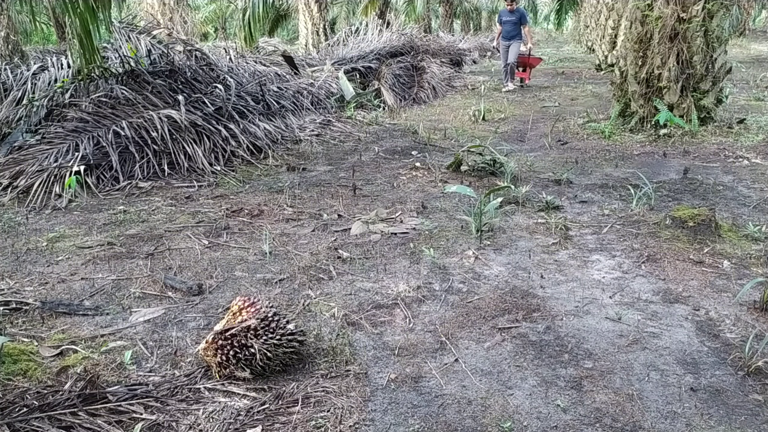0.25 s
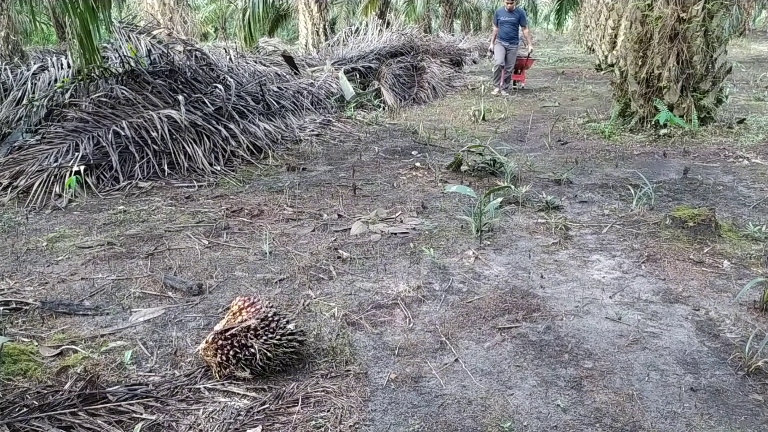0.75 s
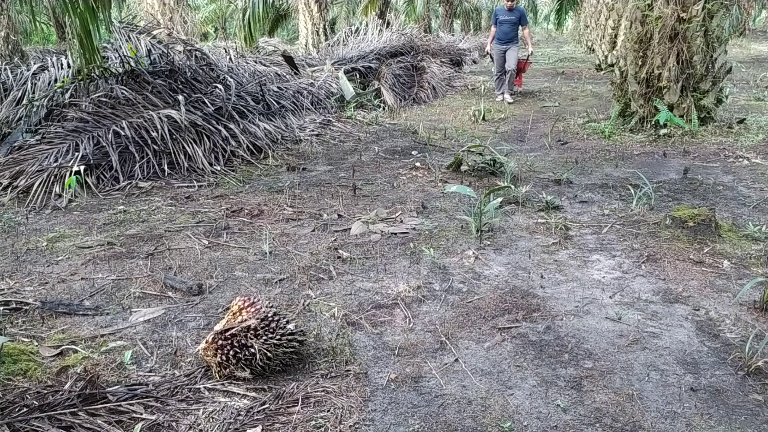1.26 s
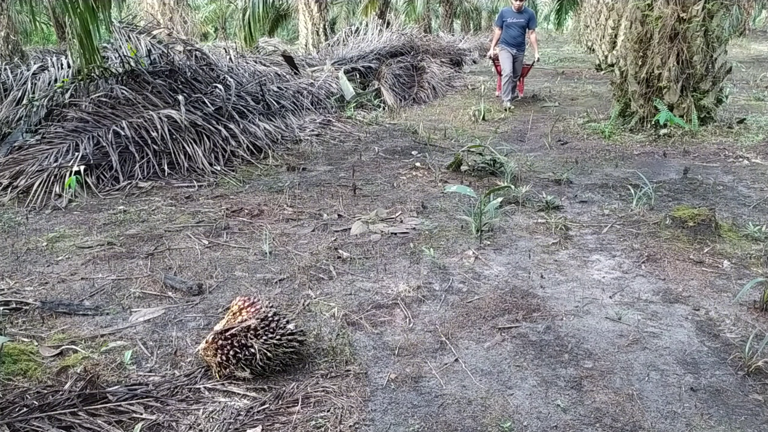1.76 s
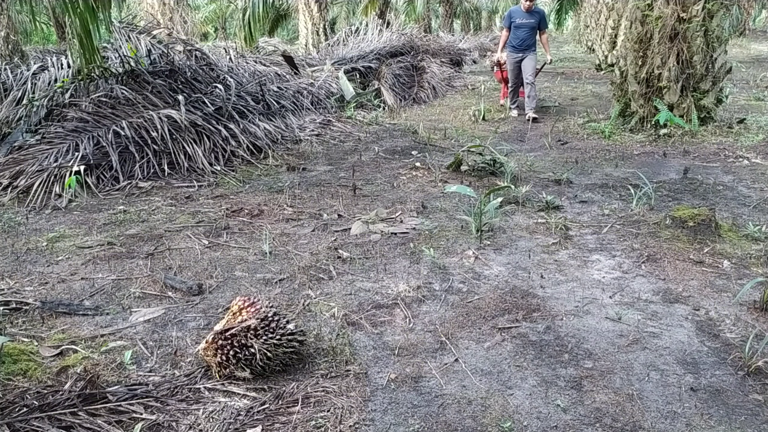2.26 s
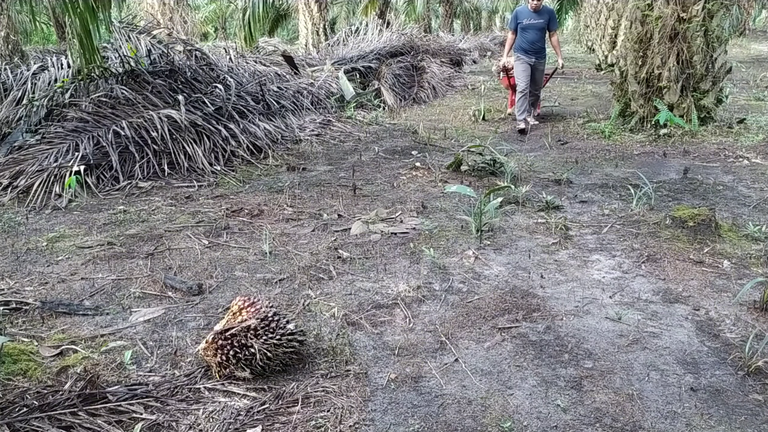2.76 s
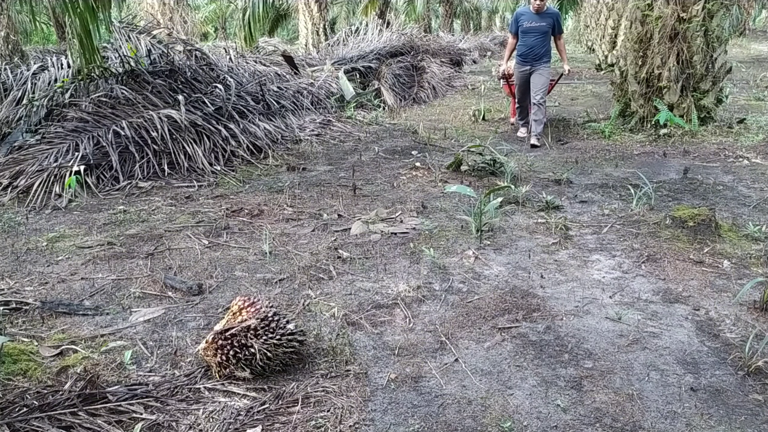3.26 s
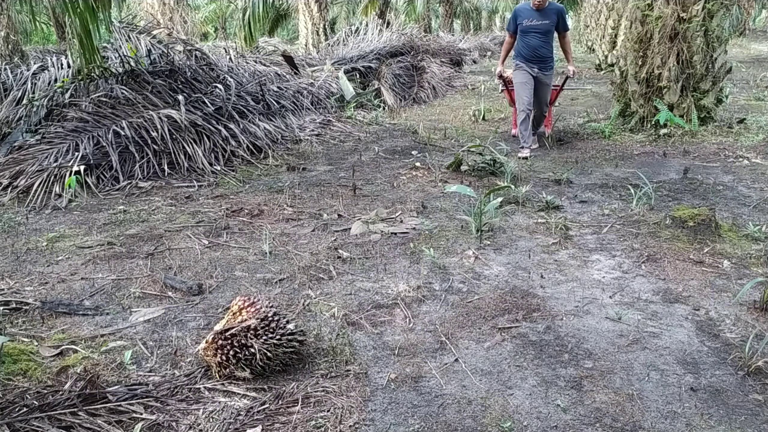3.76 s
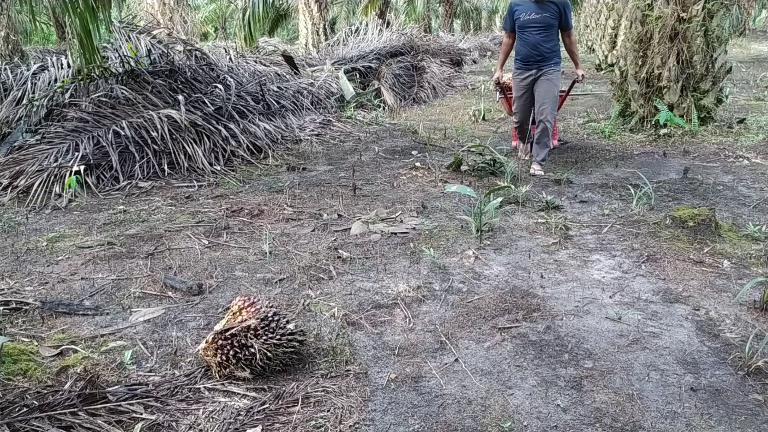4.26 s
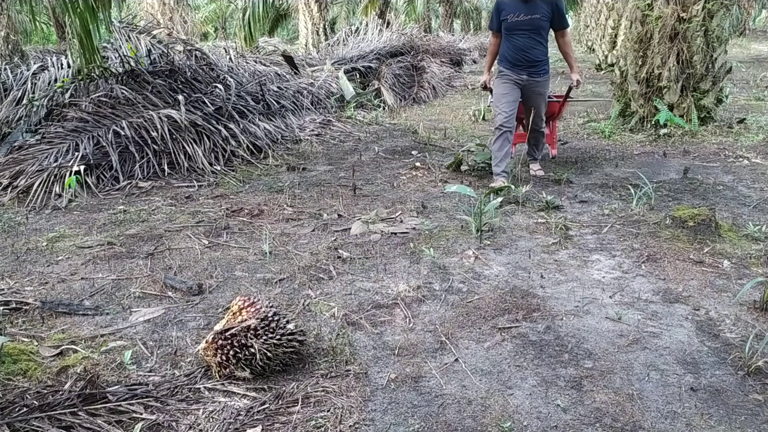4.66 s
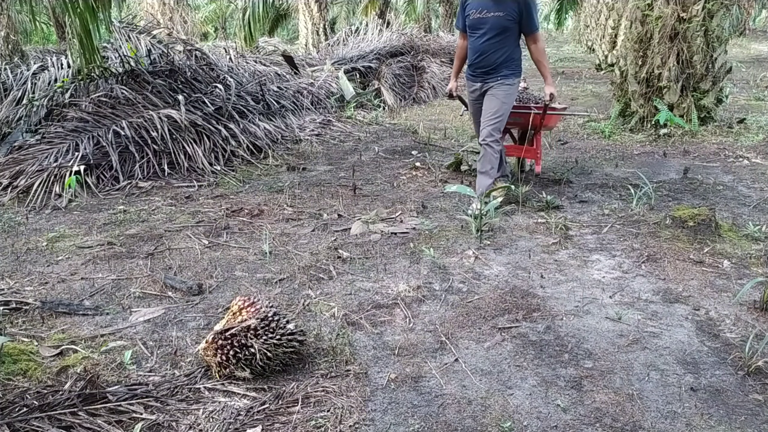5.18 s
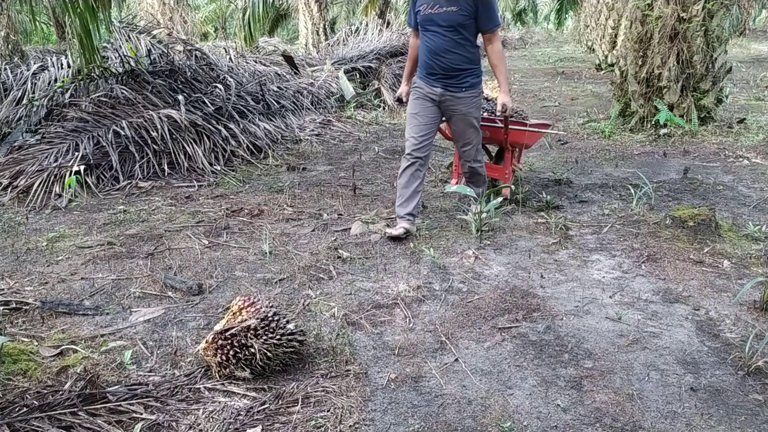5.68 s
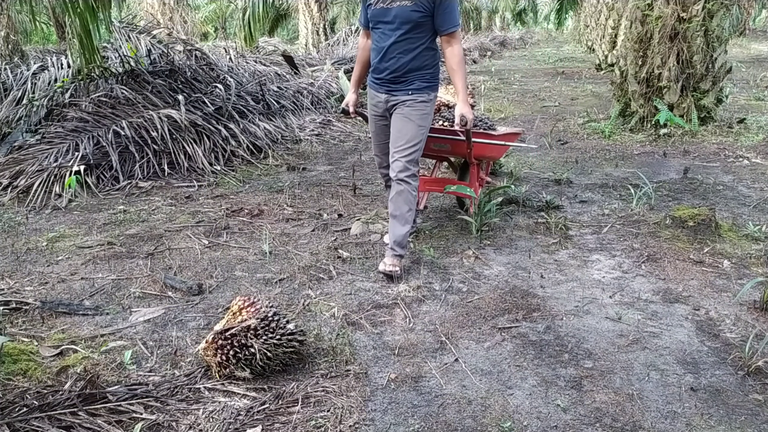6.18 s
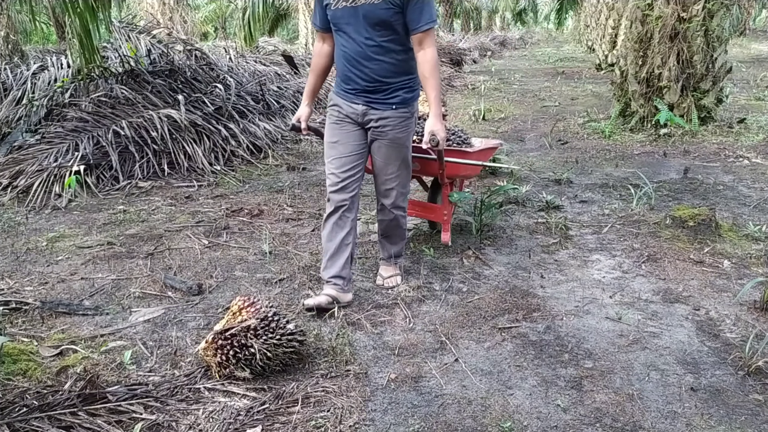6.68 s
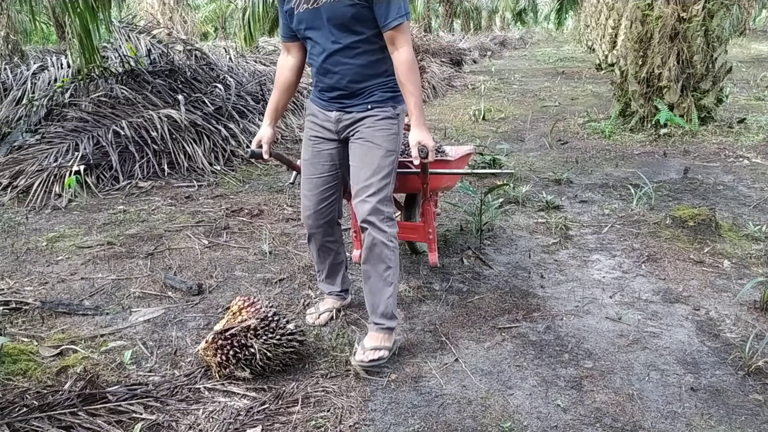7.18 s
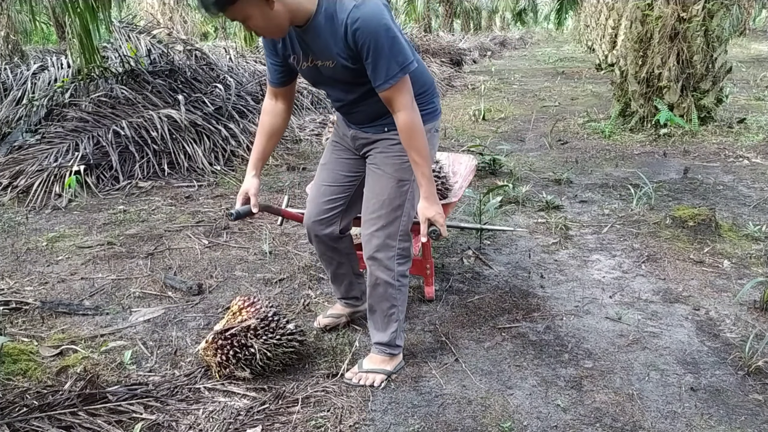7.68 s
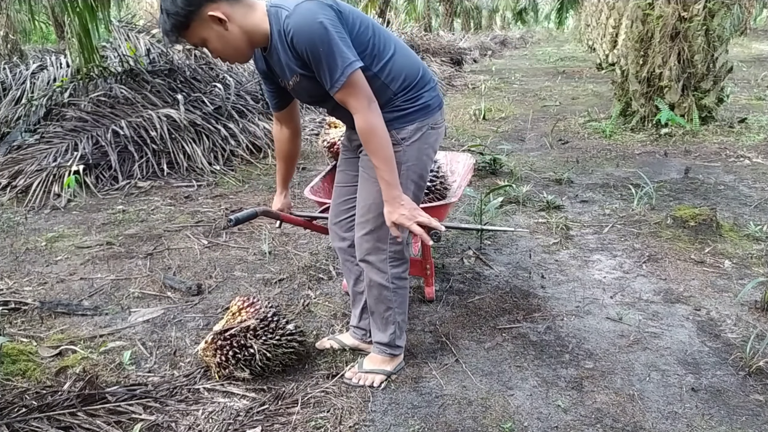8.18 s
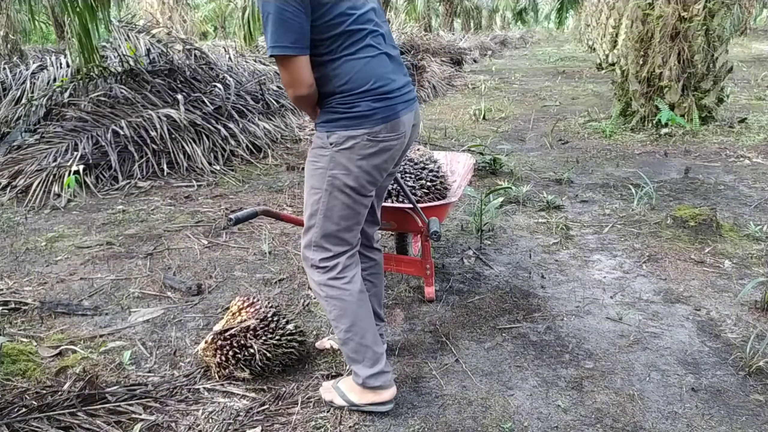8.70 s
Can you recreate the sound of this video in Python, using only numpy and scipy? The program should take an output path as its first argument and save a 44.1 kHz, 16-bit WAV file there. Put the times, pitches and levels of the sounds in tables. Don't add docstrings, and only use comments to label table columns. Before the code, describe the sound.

Dense, shrill insect noise surrounds the microphone outdoors, with pulsing chirps and buzzy trills above a faint distant engine hum. Soft footsteps and wheel rumble approach across dry ground, with small metal rattles and sharp twig cracks growing clearer. Close by, the barrow is set down: a light knock, a loud clattering bang, then a brighter rod clank with a short ring. Afterwards only insects, slight rustling and low hum remain.

```python
import sys
import numpy as np
from scipy import signal
from scipy.io import wavfile
from scipy.ndimage import uniform_filter1d

SR = 44100
rng = np.random.default_rng(int(sys.argv[2]) if len(sys.argv) > 2 else 0)


def decibels_to_gain(level_db):
    exponent = np.asarray(level_db, float) / 20
    return 10 ** exponent


def materialize(psi):
    bounded = np.clip(np.atleast_2d(psi).T, -1, 1)
    quanta = np.round(bounded * 32767).astype(np.int16)
    wavfile.write(sys.argv[1], SR, quanta)


N = 394254


def evened(x):
    return x / np.sqrt(np.mean(x ** 2) + 1e-20)


def read(points, hz):
    f, value = np.transpose(points)
    return np.interp(np.log(hz + 1), np.log(f + 1), value)


def curves(rows, t):
    s, *columns = np.transpose(rows)
    return [np.interp(t, s, c) for c in columns]


def add(mix, s, sound):
    part = mix[round(s * SR):][:len(sound)]
    part += sound[:len(part)]


def band(x, lo_hz, hi_hz):
    edges_hz = [lo_hz, min(hi_hz, SR / 2.1)]
    return signal.sosfilt(signal.butter(2, edges_hz, "band", fs=SR, output="sos"), x)


def resonate(x, hz, width):
    turn = np.exp(2j * np.pi * np.cumsum(hz * np.ones(len(x))) / SR)
    r = np.exp(-np.pi * width / SR)
    return 2 * (turn * signal.lfilter([1 - r], [1, -r], x / turn)).real


def ring(x, modes, factor=1):
    t = np.arange(SR // 3) / SR
    body = sum(decibels_to_gain(db - 60 * t / (t60 * factor)) * np.sin(2 * np.pi * hz * t) for hz, db, t60 in modes)
    return signal.oaconvolve(x, body)


def humps(t, s, db, rise, fall):
    late = t[:, None] - s
    event_db = db - np.where(late < 0, -rise * late, fall * late)
    return np.sqrt((decibels_to_gain(event_db) ** 2).sum(1))


def grains(share, spread_db):
    size = decibels_to_gain(spread_db * np.minimum(rng.exponential(1, N), 2.5))
    return size * rng.standard_normal(N) * (rng.random(N) < share)


def hiss(shape_db, patchy_db):
    # f/Hz, left-right correlation
    likeness = [(60, .94), (130, .96), (290, .95), (640, .8), (1410, .4), (3100, .1), (6820, 0), (15000, 0)]
    # f/Hz, left minus right/dB
    lean = [(60, 15.5), (180, 10), (550, 0), (1650, -0.5), (4970, -2), (15000, 5.5)]
    hz = np.fft.rfftfreq(1024, 1 / SR)
    a, b, c, d, patches = rng.standard_normal((N // 256 + 5, 513, 5)).T
    patches = evened(uniform_filter1d(uniform_filter1d(patches, 8, 0), 12, 1))
    same = np.clip(read(likeness, hz), -1, 1)[:, None]
    left = a + 1j * b
    right = same * left + np.sqrt(1 - same ** 2) * (c + 1j * d)
    side_db = read(lean, hz)[:, None] * np.array([.5, -.5])[:, None, None]
    z = np.array([left, right]) * decibels_to_gain(shape_db + patchy_db * patches + side_db)
    return evened(signal.istft(z, nperseg=1024, noverlap=768)[1][:, :N])


def place(x, pan_db, lag, wet_db, t60, lo_hz=150, hi_hz=7460):
    t = np.arange(SR // 4) / SR
    taps = rng.standard_normal((t.size, 2)).T * (rng.random((t.size, 2)).T < .06)
    taps = band(taps * decibels_to_gain(-60 * t / t60) * (t > .002), lo_hz, hi_hz)
    echoes = signal.oaconvolve(x[None], taps / np.linalg.norm(taps[0]), axes=1)[:, :N]
    direct = np.array([np.roll(x, lag) * decibels_to_gain(pan_db / 2), x * decibels_to_gain(-pan_db / 2)])
    return direct + decibels_to_gain(wet_db) * echoes


def air():
    # f/Hz, density/dB per Hz
    air_spectrum = [(15, -36), (25, 0), (66, -13), (112, -20), (200, -3), (307, -14.5), (977, -20),
                    (2790, -21.5), (2980, -15.5), (3940, -49), (4200, -55), (5460, -61), (9240, -120)]
    shape_db = read(air_spectrum, np.fft.rfftfreq(1024, 1 / SR))[:, None]
    return decibels_to_gain(-60.5) * hiss(shape_db, patchy_db=4.5)


def chorus():
    # f/Hz, density/dB per Hz
    song_bands = [(4500, -14.5), (5400, -6.5), (5900, -10.5), (7100, -0.5), (8000, -8), (8350, -8),
                  (8650, -15.5), (9100, -4.5), (10300, 2.5), (11000, -4), (11450, -18.5), (12300, -55),
                  (12800, -15.5), (15000, -22)]
    # t/s, level/dB, upper singers relative/dB
    swell = [(0.0, -44.5, -2.5), (3.5, -44.5, -2), (4.3, -44, -1.5), (6.8, -44, -2.5), (7.9, -45, -3.5),
             (8.05, -46, -2.5), (8.94, -46, -1)]
    hz, t = np.fft.rfftfreq(1024, 1 / SR), np.arange(N // 256 + 5) * 256 / SR
    upper_db = np.outer(hz > 8650, curves(swell, t)[1])
    upper_db = upper_db - 40 * np.clip((4500 - hz) / 900, 0, 2)[:, None]
    level_db = curves(swell, np.arange(N) / SR)[0]
    return decibels_to_gain(level_db) * hiss(read(song_bands, hz)[:, None] + upper_db, patchy_db=1.5)


def engine():
    # t/s, level/dB
    engine_course = [(0.0, -60.5), (0.9, -61), (3.0, -58.5), (3.7, -56), (4.76, -57), (5.2, -59.5),
                     (8.36, -60.5), (8.46, -53.5), (8.94, -51)]
    # f/Hz, phase wander/rad, level/dB, share of the swell followed
    orders = [(35, 2, -6, .3), (52.5, 1.1, 3, 1), (70, 1.5, -2.5, .1), (87.5, 2, -15, 0), (105, 2, -16, 0)]
    throbs = [.7, .12, .8, 1, 1]
    t = np.arange(N) / SR
    level_db = curves(engine_course, t)[0]
    mean_db = level_db.mean()
    slow = t[::441]
    drift = [np.interp(t, slow, uniform_filter1d(rng.standard_normal(slow.size), size=12)) for _ in orders]
    hum = np.zeros(N)
    for (hz, wander, db, share), throb, d, e in zip(orders, throbs, drift, drift[1:] + drift[:1]):
        strength = decibels_to_gain(db + share * (level_db - mean_db)) * (1 - throb + 3.5 * throb * e)
        hum += strength * np.sin(2 * np.pi * hz * t + wander * d)
    return decibels_to_gain(mean_db + 1.24) * hum * decibels_to_gain(np.array([[.4], [-.4]]))


def chirps():
    # start t/s, peak level/dB
    bouts = [(0.035, -43), (0.584, -42.5), (0.757, -42.5), (1.123, -43), (1.839, -43.5), (2.367, -43),
             (2.727, -42), (4.1255, -43), (4.668, -43), (5.373, -42), (6.0706, -42), (6.4405, -42.5),
             (6.615, -42.5), (6.79, -53)]
    gap_s, spread_db = .178, .5
    s, db = np.transpose(bouts)
    number = np.append(0, np.cumsum(np.round(np.diff(s) / gap_s)))
    k = np.arange(number[-1] + 1)
    return np.interp(k, number, s), np.interp(k, number, db) + spread_db * rng.standard_normal(k.size)


def cricket():
    stroke_s, gap_s, stroke_hz, fall_hz_per_s = .0064, .01265, 5720, 110000
    out, t = np.zeros(N), np.arange(round(stroke_s * SR)) / SR
    times, levels = chirps()
    chance = rng.standard_normal((len(times), 6, 2))
    for s, db, strokes in zip(times, levels, chance):
        for k, (bend, force) in enumerate(strokes):
            hz = stroke_hz + 45 * bend - fall_hz_per_s * t / 2
            tone = np.sin(2 * np.pi * hz * t) * np.hanning(len(t)) ** .6
            stroke_db = db + .6 + 1.3 * force - 2.2 * np.exp(-k / 1.6)
            add(out, s + k * gap_s, decibels_to_gain(stroke_db) * tone)
    return place(out, pan_db=-3.5, lag=-7, wet_db=-13., t60=.15)


def low_katydid():
    # t/s, peak level/dB, length/s
    calls = [(1.294, -62, 0.18), (1.982, -55, 0.12), (2.2, -51.5, 0.096), (2.478, -46.5, 0.09),
             (2.69, -49.5, 0.11), (3.135, -59, 0.2), (4.166, -58, 0.13), (4.417, -59, 0.18),
             (4.7534, -61, 0.12), (4.932, -53.5, 0.098), (5.168, -47, 0.11), (5.405, -46.5, 0.12),
             (5.614, -47, 0.15), (5.854, -46.5, 0.12), (6.099, -46.5, 0.07), (6.302, -46.5, 0.12),
             (6.549, -49, 0.077), (6.785, -51, 0.1), (7.05, -60, 0.14)]
    sweep_db = [0, -7, -6]
    rasp_s, gap_s, rasp_hz, fall_hz_per_s = .018, .041, 5400, 58000
    out, t = np.zeros(N), np.arange(round(rasp_s * SR)) / SR
    for s, db, length in calls:
        starts = np.arange(s, s + length, gap_s / len(sweep_db))
        for k, (start, (bend, force)) in enumerate(zip(starts, rng.standard_normal((16, 2)))):
            teeth = np.hanning(len(t)) ** .5 * (1 + .25 * np.sin(2 * np.pi * (98 * t + bend)))
            sweep = np.sin(2 * np.pi * (rasp_hz + 110 * bend - fall_hz_per_s * t / 2) * t)
            add(out, start, decibels_to_gain(db + 5.0 + sweep_db[k % len(sweep_db)] + 0.56 * force) * teeth * sweep)
    return place(out, pan_db=.6, lag=3, wet_db=-7., t60=.12)


def high_katydid():
    # start t/s, end t/s, level/dB, f/Hz, width/Hz
    trills = [
        (1.1, 3.2, -56.5, 6090, 240),
        (3.7, 5.95, -55.5, 6130, 300),
        (3.3, 8.5, -72, 12050, 60),
        (7.57, 7.69, -54, 13500, 600),
    ]
    fade_s, fade_db = .3, -13
    out = np.zeros(N)
    for start, end, top_db, hz, width in trills:
        t = np.arange(start, end, 1 / SR)
        db = top_db + fade_db * np.clip(1 - np.minimum(t - start, end - t) / fade_s, 0, 1)
        buzz = resonate(resonate(rng.standard_normal(len(t)), hz, width), hz, width)
        add(out, t[0], decibels_to_gain(db) * evened(buzz * (.3 + np.sin(np.pi * 32.5 * t) ** 2)))
    return place(out, pan_db=-5., lag=-4, wet_db=-1.5, t60=.2)


def rolling():
    # t/s, wheel level/dB
    wheel = [(0, -68), (0.9, -66), (1.2, -62), (3, -60), (3.9, -73), (4.2, -56), (5.1, -66), (5.45, -54.5),
             (5.8, -69), (6.8, -58.5), (7.4, -60.5), (8.35, -69), (8.5, -56.5), (8.94, -57)]
    # t/s, thud level/dB, scuff level/dB, rustle level/dB
    footfalls = [(0.0, -51.5, -71, -57.5), (0.52, -64, -91, -66), (1.03, -61, -90, -63.5),
                 (1.48, -79, -89, -61), (1.80, -53, -68, -60), (2.27, -52, -75, -67.5),
                 (2.67, -64, -93, -84), (3.08, -61.5, -91, -71), (3.7, -59.5, -72, -77),
                 (4.36, -61, -55, -56.5), (4.56, -69, -63.5, -72), (4.81, -57, -59, -67),
                 (5.2, -67, -70, -62), (5.33, -67, -64, -63), (5.76, -72, -58.5, -68),
                 (6.6, -65, -65.5, -72), (7.03, -59, -61, -77), (7.13, -56.5, -86, -74),
                 (7.42, -62, -76, -81), (8.1, -67, -83, -61), (8.45, -80, -75, -65), (8.64, -64, -87, -82),
                 (8.92, -67, -61, -57)]
    step_rise = [103, 59, 140]
    step_fall = [155, 56, 62]
    t, every = np.arange(0, N / SR + .01, .002), np.arange(N) / SR
    s, *step_db = np.transpose(footfalls)
    nearer_db = 2 * np.minimum(t, 3.34)
    grit_db, litter_db = -79, -69
    steady = [grit_db - 14, grit_db + nearer_db, litter_db + nearer_db]
    thud, grit, litter = [np.interp(every, t, np.hypot(decibels_to_gain(steady_db), humps(t, s, db, rise, fall)))
                          for steady_db, db, rise, fall in zip(steady, step_db, step_rise, step_fall)]
    wheel_noise = evened(band(band(rng.standard_normal(N), 139, 248.5), 71, 660))
    rumble = decibels_to_gain(curves(wheel, every)[0]) * wheel_noise
    rumble += decibels_to_gain(-0.5) * thud * evened(band(band(rng.standard_normal(N), 190, 570), 187, 580))
    scuff = grit * evened(band(grains(share=0.13, spread_db=5.0), 180, 3970))
    rustle = litter * decibels_to_gain(-6.5) * evened(band(grains(share=0.27, spread_db=3.5), 5800, 14600))
    near = place(rumble + scuff, pan_db=.3, lag=0, wet_db=-5., t60=.1, lo_hz=900)
    return near + place(rustle, pan_db=0.5, lag=-2, wet_db=14.5, t60=0.029)


def rattles():
    # t/s, peak level/dB, ring f/Hz, t60/s, thump relative/dB
    jolts = [(0.234, -51, 650, 0.057, -8), (0.69, -53, 740, 0.11, -13), (1.021, -51, 620, 0.17, -25),
             (1.481, -53, 2400, 0.39, -22), (1.748, -50, 1290, 0.55, -1.5), (1.789, -67, 600, 0.057, 4),
             (2.189, -59, 641, 0.18, 3), (2.26, -53, 520, 0.037, -1), (3.475, -57, 670, 0.079, 15),
             (3.905, -45, 2310, 0.063, -8), (4.311, -42.5, 638, 0.2, -7), (4.37, -37, 1900, 0.073, -7),
             (4.501, -45, 1690, 0.058, -2.5), (4.593, -47.5, 1540, 0.15, -2), (4.768, -39, 1300, 0.43, -37),
             (6.177, -44, 2730, 0.11, -22), (6.488, -46, 2590, 0.24, -20), (6.545, -54, 1630, 0.18, 4),
             (6.932, -42.5, 700, 0.27, -7.5), (7.029, -56, 725, 0.13, 12), (7.131, -34, 2400, 0.19, -6),
             (8.513, -45.5, 3060, 0.052, -23)]
    # t/s, peak level/dB, ring f/Hz, thump relative/dB
    ticks = [(1.18, -56.5, 1010, 7), (1.633, -51, 880, 3.5), (2.087, -39.5, 990, -22),
             (2.991, -44.5, 925, -2.5), (3.62, -51, 1750, -10), (3.997, -50, 1030, -1.5),
             (4.84, -46.5, 762, 3), (5.007, -48, 810, -4), (5.542, -34, 764, -23),
             (5.843, -31.5, 1830, -35), (5.957, -38.5, 1580, -16)]
    # t/s, peak level/dB, t60 of the rustle after it/s, rustle relative/dB
    snaps = [
        (1.6316, -33.5, 0.08, -10),
        (2.0834, -40, 0.08, -5),
        (3.057, -30, 0.12, -7),
        (4.127, -15, 0.14, -18),
        (4.769, -30.5, 0.44, 9),
        (4.8975, -21.5, 0.1, -10),
        (5.1393, -30, 0.06, -11),
        (5.209, -30, 0.072, -13),
        (5.5428, -25, 0.07, -10),
        (7.1338, -23, 0.17, -3),
    ]
    tick_t60 = 0.051
    out, t = np.zeros(N), np.arange(9000) / SR
    for s, db, hz, t60, thump_db in jolts + [(s, db, hz, tick_t60, thump) for s, db, hz, thump in ticks]:
        burst = rng.standard_normal(t.size) * decibels_to_gain(-60 * t / max(t60, .01))
        tick = 0.38 * band(burst * (1 + 3 * decibels_to_gain(-60 * t / 0.0039)), 520, 3060)
        tick += 0.94 * resonate(burst, hz, 610)
        thump = band(burst * np.minimum(t / 0.0037, 1), 206, 1060)
        add(out, s - .001, decibels_to_gain(db) * (tick / abs(tick).max() + decibels_to_gain(thump_db) * thump / abs(thump).max()))
    for s, db, t60, rustle_db in snaps:
        decay = 2.0 * decibels_to_gain(-60 * t / 0.0015) + decibels_to_gain(rustle_db - 60 * t / max(t60, .01))
        snap = band(rng.standard_normal(t.size) * decay, 6500, 12500)
        add(out, s - .001, decibels_to_gain(db) * snap / abs(snap).max())
    return place(out, pan_db=1.5, lag=-1, wet_db=-7., t60=.1, lo_hz=915, hi_hz=15000)


def clank():
    # t/s, peak level/dB, f/Hz, t60/s
    panels = [(7.46, -40, 331, 0.5), (7.51, -36, 579, 0.3), (7.59, -23.5, 2230, 0.096),
              (7.594, -38, 345, 0.24), (7.6, -27, 840, 0.16), (7.687, -15, 1750, 0.042),
              (7.69, -21, 956, 0.12), (7.697, -24, 735, 0.22), (7.715, -25, 191, 0.15),
              (7.762, -19.5, 480, 0.11), (7.771, -32, 1050, .2), (7.813, -21, 1077, 0.1),
              (7.905, -27, 1580, 0.072), (7.907, -22.5, 1042, 0.25), (7.909, -30.5, 499, 0.21)]
    # f/Hz, level/dB, t60/s
    singing = [(3320, -6, .14), (4120, -8, 0.32), (4748, -9, .14), (5020, -9, .24), (5750, -13, .22),
               (6654, -12, 0.28), (7111, -15, .23), (7800, 0, .2), (8700, 9, .22), (10500, -2, .14),
               (11250, -8, .2), (12150, -15, .16), (13730, -22, .2)]
    rise_s, split = 0.0082, 0.86
    out, t = np.zeros(N), np.arange(12000) / SR
    for s, db, hz, t60 in panels:
        pair = np.sin(2 * np.pi * hz * t) + .5 * np.sin(2 * np.pi * hz * split * t)
        shaken = .8 * pair + .4 * evened(resonate(rng.standard_normal(t.size), hz, hz / 10))
        add(out, s, decibels_to_gain(db - 60 * t / max(t60, .02)) * np.minimum(t / rise_s, 1) * shaken / 1.7)
    bounce = rng.standard_normal(t.size) * decibels_to_gain(-60 * t / .03)
    rod = ring(bounce, [(hz * near, db, t60) for hz, db, t60 in singing for near in (.985, 1, 1.013)])
    add(out, 7.902, decibels_to_gain(-20) * rod / abs(rod).max())
    return out


# f/Hz, level/dB, t60/s
TRAY_MODES = [(187.5, -14, .2), (268, -4, .2), (335, -8, .15), (470, -2, .18), (738, -1, .2), (930, 1, .13),
              (990, 3, .13), (1070, 3, .14), (1235, 0, .09), (1590, -3, .07), (1760, 0, .05),
              (2300, -7, .05), (3047, -4, .07)]


def blows():
    # t/s, peak level/dB, brightness/dB, ring factor, rise of the tray/s
    hits = [
        (7.456, -48.5, -26, 2, 0.0026),
        (7.523, -39.5, -1, 2.3, .004),
        (7.59, -24, -2, 1.7, 0.0061),
        (7.68, -20, -14, 0.37, 0.0031),
        (7.687, -11.5, 4, 1, 0.0016),
        (7.72, -22.5, -1, 1.6, 0.0033),
        (7.764, -39, -8, 0.39, .003),
        (7.813, -30, -8, 1.3, 0.014),
        (7.903, -18.5, 12, 0.89, 0.005),
        (7.962, -32.5, 1, 1.56, 0.0036),
    ]
    # f/Hz, level/dB, t60/s
    rod_modes = [(4870, 8, 0.27), (5720, 15, 0.065), (7000, -1, 0.032), (8460, -12, 0.17),
                 (9200, -1, 0.099), (10100, 32, 0.033), (10800, 18, 0.21), (13600, -18, 0.067)]
    out, t = np.zeros(N), np.arange(9000) / SR
    for s, db, bright_db, factor, rise in hits:
        chatter = rng.standard_normal(t.size) * decibels_to_gain(-60 * t / (0.24 * factor))
        crack = rng.standard_normal(t.size) * decibels_to_gain(-60 * t / 0.12)
        dull = evened(ring(chatter, TRAY_MODES, 1.0)[:t.size])
        dull += 1.26 * evened(band(chatter + 2.4 * crack, 830, 3300))
        dull *= np.minimum(t / max(rise, .001), 1)
        bright = 1.54 * evened(ring(chatter, rod_modes, 0.16)[:t.size])
        bright += 0.19 * evened(band(chatter + 1.3 * crack, 4130, 7500))
        bright += 1.3 * evened(band(chatter + 1.5 * crack, 6500, 11500))
        add(out, s - .001, decibels_to_gain(db) * (dull / abs(dull).max() + decibels_to_gain(bright_db) * bright / abs(bright).max()))
    return out


def clatter():
    # t/s, level/dB, treble relative/dB, thud relative/dB, fade/dB per s
    bursts = [
        (7.472, -39, -29.5, -3.5, 84),
        (7.525, -43, -22, -13, 90),
        (7.55, -36, -13, -13, 90),
        (7.596, -25.5, -17, -4, 193),
        (7.689, -20, 5.5, -3.5, 91),
        (7.912, -27.5, -8, -3, 206),
    ]
    s, db, treble_db, thud_db, fade = np.transpose(bursts)
    fade = np.maximum(fade, 80)
    t = np.arange(s[0] - .05, s[-1] + .45, 1 / SR)
    body, treble, thud = [humps(t, s, db - 11.0 + rel, 1100, fade * share)
                          for rel, share in [(0, 1), (treble_db, 3.9), (thud_db, 0.78)]]
    knocks = grains(share=0.07, spread_db=3.5)[:t.size]
    low = .3 * evened(ring(knocks, TRAY_MODES, .25)[:t.size])
    low += evened(band(band(knocks, 350, 1600), 300, 3000))
    deep = evened(band(band(knocks, 116, 430), 116, 430))
    out = np.zeros(N)
    add(out, t[0], body * low + thud * deep + treble * evened(band(knocks, 2900, 18000)))
    return out


def drop():
    out = band(clank() + blows() + clatter(), 190, 9530)
    heard = place(out, pan_db=0.2, lag=-2, wet_db=-8., t60=0.06, lo_hz=800, hi_hz=13000)
    shade = np.array([[.25], [-.25]])
    return heard + shade * band(heard, 3100, 22000)


def scene():
    grove = air() + chorus() + engine() + cricket() + low_katydid() + high_katydid()
    return grove + rolling() + rattles() + drop()


def unmasked(x):
    # f/Hz, margin/dB
    margin = [(1800, 9), (2300, 4), (2800, 2), (3200, 1), (3700, 1.3), (4200, 4), (4500, 6), (5300, 5),
              (6000, 2.6), (6600, 3.6), (7900, 2.6), (8600, 4), (10300, 4), (11400, 4.5), (12100, .6),
              (13500, 1.5), (15300, .2), (15900, -12)]
    lead = 453
    hz, _, z = signal.stft(np.pad(x, ((0, 0), (lead, 2048))), SR, nperseg=1024, noverlap=768)
    z = z[:, :, :z.shape[2] // 4 * 4]
    fine = (abs(z[:, :512]) ** 2).sum(0).reshape(128, 4, -1, 4).mean((1, 3))
    power = (fine + .2 * np.roll(fine, shift=1, axis=1)) / 1.2
    around = uniform_filter1d(uniform_filter1d(power, size=4, axis=0), size=5, axis=0, origin=0)
    total, centre_hz = fine[3:].sum(0), hz[2:512:4]
    attack = (total > 2.5 * np.roll(total, shift=1)) | (np.roll(total, shift=-1) > 4 * total)
    strong = power > around * decibels_to_gain(-2 * read(margin, centre_hz))[:, None]
    heard = strong | (centre_hz[:, None] < margin[0][0]) | attack
    heard = np.pad(np.kron(heard, np.ones((4, 4))), ((0, 1), (0, 0)))
    return signal.istft(z * heard, SR, nperseg=1024, noverlap=768)[1][:, lead:lead + N]


def top_cut(x):
    return signal.sosfilt(signal.butter(12, 16450, fs=SR, output="sos"), x)


def record(dry):
    mix = unmasked(dry)
    return top_cut(mix)


dry = scene()
out = record(dry)
materialize(out)
```